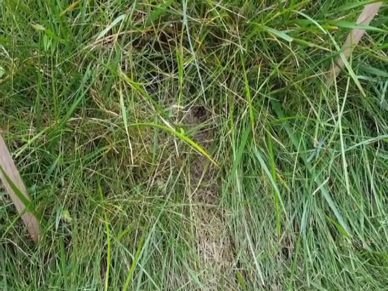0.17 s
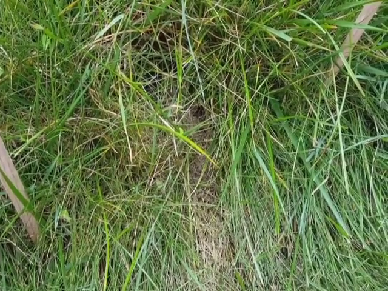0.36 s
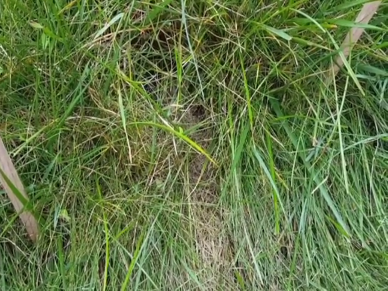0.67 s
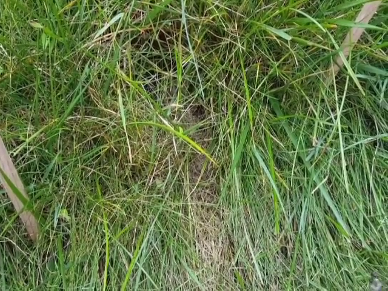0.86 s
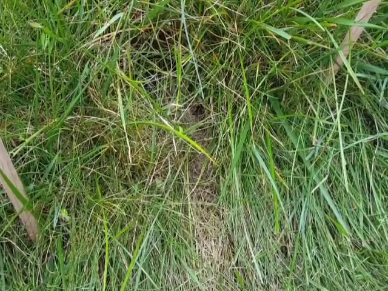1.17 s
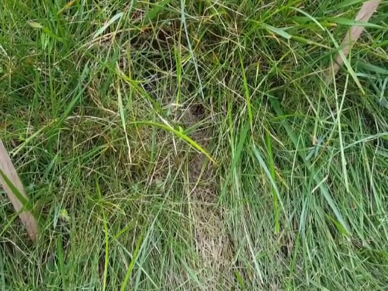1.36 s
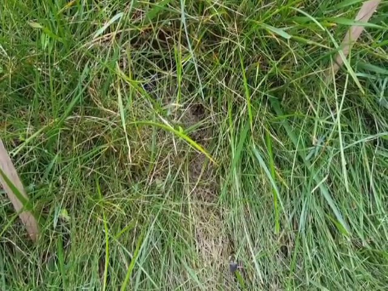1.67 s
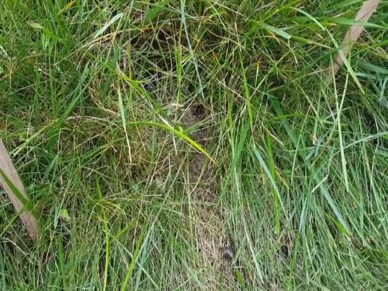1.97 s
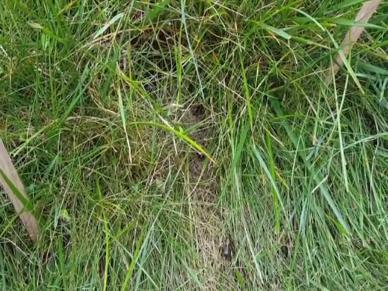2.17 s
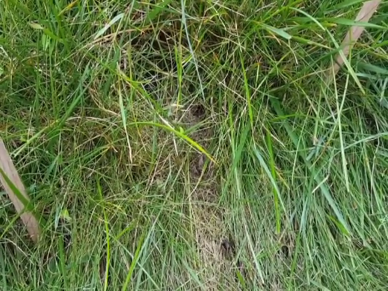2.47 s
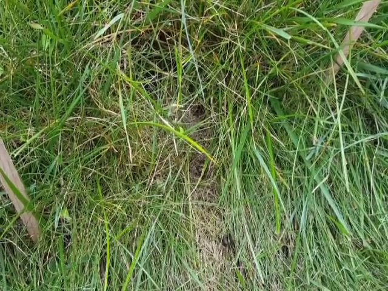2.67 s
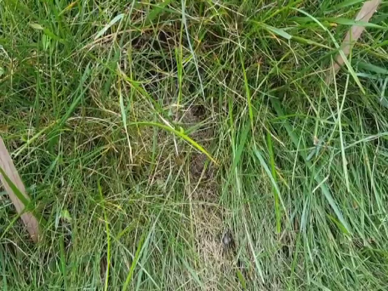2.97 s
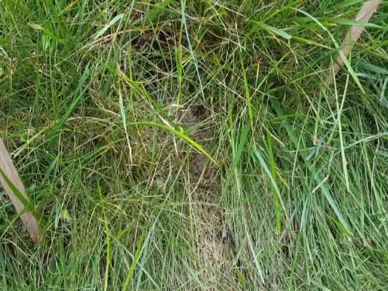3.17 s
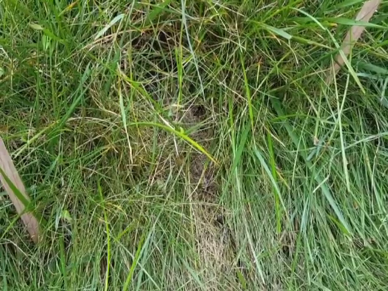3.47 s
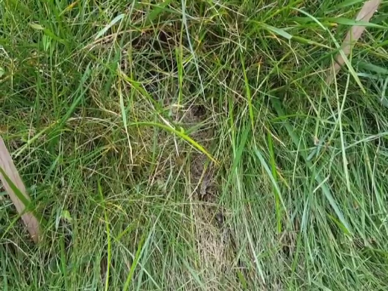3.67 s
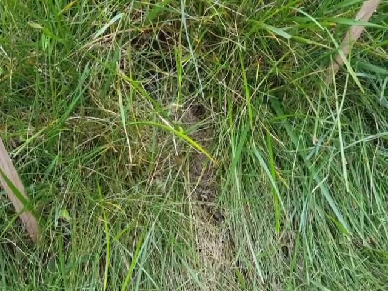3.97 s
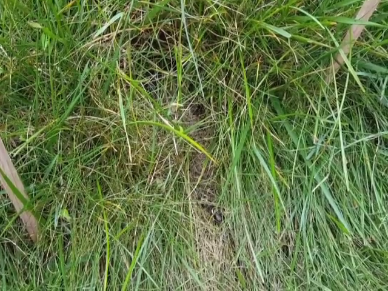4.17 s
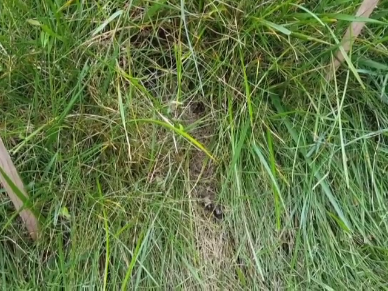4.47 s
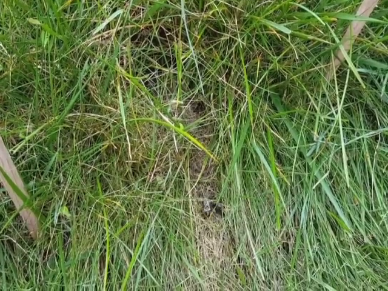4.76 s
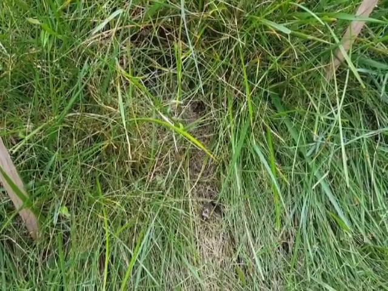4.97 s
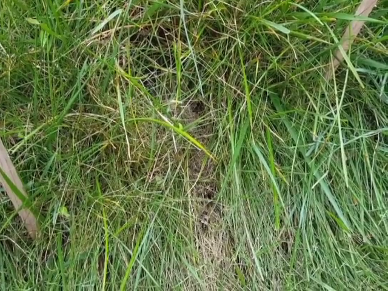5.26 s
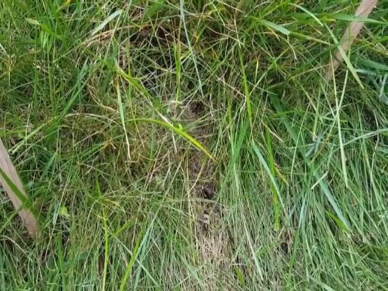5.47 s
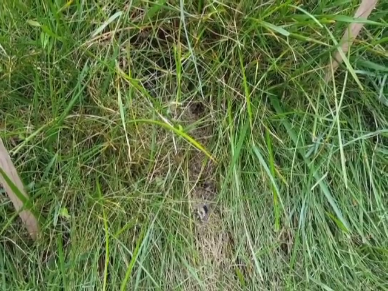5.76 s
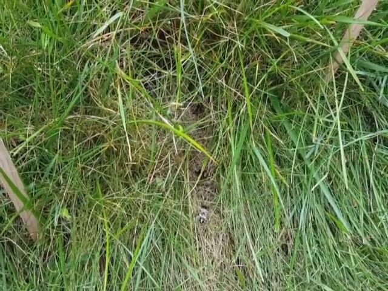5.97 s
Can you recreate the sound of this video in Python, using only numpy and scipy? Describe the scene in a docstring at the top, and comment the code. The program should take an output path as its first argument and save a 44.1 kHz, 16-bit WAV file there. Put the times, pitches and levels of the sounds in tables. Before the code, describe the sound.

Outdoors on a quiet lawn, a bumblebee's low wavering buzz circles for about two seconds, then drops to almost nothing as it lands. Fingers bump, rub and creak against the microphone case in clusters, the loudest a heavy tumble of hollow thuds around four seconds. A faint steady hum comes from the nest hole. The buzz returns abruptly near the end.

```python
"""A bumblebee circles with a wavering buzz over a lawn, lands and takes off again, while fingers bump
and rub a hand-held camera case and a deep steady hum comes from the nest hole in the ground.
The bees are harmonic sums locked to the wingbeat; bumps, creaks and crunches are forces on resonant modes.
Swishes and the soft outdoor hush are coloured noise, whines and a faint drone are wavering tones,
and faint far-off chirps are bursts of noise in narrow bands."""
import sys
import numpy as np
from scipy import signal
from scipy.fft import rfft, irfft, next_fast_len
from scipy.io import wavfile

SR = 44100
rng = np.random.default_rng(int(sys.argv[2]) if len(sys.argv) > 2 else 0)


def to_wav(sig):
    """Store sig (one row per channel, or 1-D mono) as 16-bit WAV at the path in sys.argv[1].

    Samples outside -1..1 are clipped; the rate is SR.
    """
    pcm = np.clip(np.atleast_2d(sig), -1, 1) * 32767
    pcm = np.round(pcm).astype(np.int16)
    wavfile.write(sys.argv[1], SR, pcm.T)  # frames by channels


N = 269715
TIME = np.arange(N) / SR
PORT_LAG_S = 0.0004  # case sounds reach the right port this much later


def from_db(db):
    """Logarithmic level: decibels to amplitude gain."""
    return 10 ** (np.asarray(db) / 20)


def rms_one(x):
    """Normalisation: scale to an effective value of 1."""
    return x / np.sqrt(np.mean(x ** 2) + 1e-20)


def in_time(rows):
    """Linear interpolation: each column of a timed table becomes a curve with one value a sample."""
    s, *columns = np.transpose(rows)
    return [np.interp(TIME, s, column) for column in columns]


def at_hz(points, hz):
    """Logarithmic frequency scale: read a spectrum between its points."""
    point_hz, values = np.array(points).T
    return np.interp(np.log(hz), np.log(point_hz), values)


def drift(rate_hz):
    """Low-passed random process: a slow wander of spread 1."""
    step = 40  # samples between the values of the slow process
    pole = np.exp(-2 * np.pi * rate_hz * step / SR)
    noise = rng.standard_normal(N // step + 2002)
    slow = signal.lfilter([1], [1, -2 * pole, pole * pole], noise)[2000:]  # drop the start-up
    return np.interp(np.arange(N) / step, np.arange(len(slow)), rms_one(slow))


def coloured(spectrum):
    """Spectral shaping: white noise weighted by frequency, with rms 1."""
    size = next_fast_len(N, True)
    hz = np.maximum(np.fft.rfftfreq(size, 1 / SR), 1)
    shaped = rfft(rng.standard_normal(N), size) * from_db(at_hz(spectrum, hz))
    return rms_one(irfft(shaped, size)[:N])


def ringing(modes):
    """Modal superposition: the impulse response of parallel damped resonances, with energy 1."""
    t = TIME[:SR // 4]
    out = sum(from_db(db) * width * np.exp(-np.pi * width * t) * np.cos(2 * np.pi * hz * t)
              for hz, width, db in modes)
    # the response falls steeply outside the range of the modes
    low_hz, high_hz = 0.55 * modes[0][0], min(0.87 * modes[-1][0], SR / 2 - 1000)
    out = signal.sosfilt(signal.butter(3, low_hz, "high", fs=SR, output="sos"), out)
    out = signal.sosfilt(signal.butter(4, high_hz, fs=SR, output="sos"), out)
    return out / np.sqrt(np.sum(out ** 2))


def through(force, modes):
    """Linear convolution: a force sets the modes ringing."""
    return signal.fftconvolve(force, ringing(modes))[:N]


def at_ports(x, lag_s, pan_db):
    """Time and level differences: the right port gets the sound after a lag and at another level."""
    later = np.interp(TIME - lag_s, TIME, x)
    return np.array([x * from_db(pan_db / 2), later * from_db(-pan_db / 2)])


def swell(s, length_s, attack_s, fade_db_per_s):
    """Envelope: linear attack from time s, a hold to the end of the length, then exponential decay."""
    attack = np.clip((TIME - s) / attack_s, 0, 1)
    return attack * from_db(-fade_db_per_s * np.maximum(TIME - s - length_s, 0))


def add(out, s, x):
    """Superposition: mix x into out from time s."""
    at = round(s * SR)
    out[at:at + len(x)] += x[:N - at]


def overtone_numbers(count):
    """Harmonic series: 1, 2, .. count."""
    return np.arange(1, count + 1)


def wingbeat(pitch_hz, jitter):
    """Frequency modulation: the phase of wings whose rate wavers by the fraction jitter."""
    return 2 * np.pi * np.cumsum(pitch_hz * (1 + jitter * drift(31.2))) / SR


# spectrum of the outdoor hush, relative: hz [Hz], density_db [dB per Hz]
HUSH = [(25, -33), (45, 4.5), (65, -0.5), (110, 5.5), (190, -9), (300, -10.5), (480, -16.5), (900, -14.5),
        (1500, -20.5), (2700, -19), (4000, -27.5), (6700, -30.5), (10000, -41), (13500, -34.5)]
# left-right correlation of the hush: hz [Hz], likeness [-1 to 1]
LIKENESS = [(60, 1), (250, 0.93), (500, 0.82), (1000, 0), (2000, 0), (14000, 0.049)]
# faint steady drone: hz [Hz], level_db [dB, before its drift]
DRONE = [(161, -65), (398, -74.5)]
HUSH_DB = -52


def outdoors():
    """Partial coherence: a hush alike at both ports in the bass, with a faint drone of wavering tones."""
    size = next_fast_len(N, True)
    hz = np.maximum(np.fft.rfftfreq(size, 1 / SR), 1)
    alike = np.clip(at_hz(LIKENESS, hz), -1, 1)
    mid, side = rfft(rng.standard_normal((2, size)))
    pan_db = at_hz([(100, -2.0), (1000, -1.0), (4000, -2.5), (8000, -3.0), (13000, 0.0)], hz)
    signs = np.array([[1], [-1]])  # left, right
    colour = from_db(at_hz(HUSH, hz) + signs * pan_db / 2) * np.minimum(hz / 20, 1)
    mixed = np.sqrt(1 + alike) * mid + np.sqrt(1 - alike) * side * signs
    hush = rms_one(irfft(colour * mixed, size)[:, :N])
    drone = np.zeros(N)
    for tone_hz, level_db in DRONE:
        phase = 2 * np.pi * np.cumsum(tone_hz * (1 + 0.0032 * drift(6.6))) / SR
        drone += from_db(level_db + 3.5 * drift(3)) * np.sqrt(2) * np.sin(phase)
    return from_db(HUSH_DB + 1.04 * drift(27)) * hush + drone


# faint chirps far off: start_s [s], length_s [s], level_db [dB, relative]
CHIRPS = [(.76, .06, -71), (.95, .05, -69), (1.07, 0.056, -71), (1.249, 0.033, -74), (2.004, .06, -67),
          (3.129, 0.069, -63), (3.34, 0.066, -69.5), (3.56, .05, -77), (3.771, 0.061, -70),
          (4.705, 0.083, -79), (5.085, 0.073, -71), (5.272, .05, -79), (5.827, 0.058, -74),
          (6.006, .05, -73)]
# bands of the chirps: hz [Hz], width_hz [Hz], level_db [dB, relative]
CHIRP_MODES = [(2400, 300, -17), (2740, 140, 4), (3420, 300, -17.5)]
CHIRP_ATTACK_S, CHIRP_FADE_DB_PER_S = 0.019, 223


def chirps():
    """Band-limited noise: distance blurs each chirp into a narrow band of hiss."""
    gain = sum(from_db(db) * swell(s, length, CHIRP_ATTACK_S, CHIRP_FADE_DB_PER_S)
               for s, length, db in CHIRPS)
    hiss = np.array([through(rng.standard_normal(N), CHIRP_MODES) for _ in "LR"])
    return gain * from_db(2.0 * drift(60)) * hiss


# the grip slides on the case: start_s [s], length_s [s], rumble_db [dB, relative],
# hiss_db [dB, relative]
SLIDES = [(0, 0.033, -32, -65), (0.25, 0.11, -40, -64), (0.374, 0.081, -38.5, -73),
          (1.24, 0.036, -73, -63.5), (1.423, 0.05, -48, -62), (1.513, 0.04, -48, -57.5),
          (1.594, 0.036, -35.5, -70), (1.907, 0.021, -73, -60), (2.05, 0.047, -47.5, -72),
          (2.299, 0.095, -37, -62), (2.427, 0.089, -43, -67), (2.629, 0.04, -37, -87),
          (2.945, 0.084, -39, -82), (3.931, 0.045, -20.5, -96), (4.288, 0.15, -36, -98.5),
          (5.685, 0.089, -45.5, -64.5), (5.896, 0.27, -58.5, -66)]
SLIDE_ATTACK_S, RUMBLE_FADE_DB_PER_S, HISS_FADE_DB_PER_S = 0.015, 95.5, 239


def swish():
    """Friction noise: skin brushing the case hisses in uneven grains."""
    sliding = sum(from_db(hiss_db) * swell(s, length, SLIDE_ATTACK_S, HISS_FADE_DB_PER_S)
                  for s, length, _, hiss_db in SLIDES)
    colour = [(800, -33.5), (2500, -0.5), (5000, -8.5), (8000, -9.5), (10000, -19.0), (13500, -10.5)]
    return sliding * from_db(2.1 * drift(80)) * np.array([coloured(colour), coloured(colour)])


# thin falling whines: start_s [s], length_s [s], start_hz [Hz], level_db [dB, before flutter]
WHINES = [(0.241, 0.22, 3610, -63), (2.354, 0.012, 3690, -55.5), (4.022, 0.11, 3520, -66.5)]
WHINE_ATTACK_S, WHINE_SAG_HZ_PER_S = 0.01, 1050
WHINE_FADE_DB = 7  # lost over each further stretch of its own length


def whine(s, length_s, start_hz, level_db):
    """Frequency and amplitude modulation: a thin grainy tone of rubbing sinks, with a faint octave."""
    hz = start_hz - WHINE_SAG_HZ_PER_S * np.clip(TIME - s, 0, 1)
    waver = 0.026 * drift(350)
    phase = 2 * np.pi * np.cumsum(hz * (1 + waver)) / SR
    flutter = 0.8 + 0.55 * drift(150)
    gain = swell(s, length_s, WHINE_ATTACK_S, WHINE_FADE_DB / length_s) * from_db(level_db) * flutter
    tone = np.sin(phase) + from_db(-10.0) * np.sin(2 * phase)
    return at_ports(gain * tone, lag_s=0.00003, pan_db=-5.5)


# quick runs of stick and slip: start_s [s], length_s [s], level_db [dB, relative]
CRUNCHES = [(1.531, 0.015, -47.5), (1.684, 0.0046, -46), (2.344, 0.0078, -68), (2.651, 0.0069, -53)]
# high modes of the case: hz [Hz], width_hz [Hz], level_db [dB, relative]
CRUNCH_MODES = [(2250, 240, 1), (2490, 110, 10), (3000, 120, 4), (3980, 130, -7), (5100, 270, -40),
                (6150, 370, -26), (8450, 1600, -36)]
CRUNCH_SLIPS_PER_S, CRUNCH_ATTACK_S, CRUNCH_FADE_DB_PER_S = 1300, 0.0011, 900


def crunches():
    """Stick-slip friction: dense slips of uneven size ring high modes, partly differently at each port."""
    gain = sum(from_db(db) * swell(s, length, CRUNCH_ATTACK_S, CRUNCH_FADE_DB_PER_S)
               for s, length, db in CRUNCHES)
    slips = (rng.random((3, N)) < CRUNCH_SLIPS_PER_S / SR) * rng.standard_normal((3, N))
    shared, left, right = (through(gain * rms_one(row), CRUNCH_MODES) for row in slips)
    return at_ports(shared, PORT_LAG_S, pan_db=-7.5) + from_db(-13.0) * np.array([left, right])


BUMP_S = 0.015  # a bump's force has the energy of a unit-rms force this long
ONSET_S = 0.000082  # time constant of the rattle's near-instant onset
RATTLE_GRAIN_DB, RATTLE_GRAINS_PER_S = 4.5, 232  # the rattle comes in uneven little knocks


def push(rattle, t60):
    """Impulsive excitation: one push, and a grainy rattle of the grip that starts at once and dies."""
    t = TIME[:SR // 2]
    lumps = np.interp(t, np.arange(128) / RATTLE_GRAINS_PER_S, rng.standard_normal(128))
    grain = from_db(RATTLE_GRAIN_DB * lumps) * rng.standard_normal(len(t))
    shape = (1 - np.exp(-t / ONSET_S)) * from_db(-60 * t / max(t60, 0.01))
    force = rattle * rms_one(grain * shape) / np.sqrt(len(t))
    force[0] += 1
    return np.sqrt(BUMP_S * SR / (1 + rattle ** 2)) * force


# finger bumps on the case: start_s [s], level_db [dB, relative], heft_db [dB of added boom],
# hardness_db [dB, scaled by each growth factor for knock and clack], snap_db [dB of added dry crack],
# pitch_hz [Hz, thud tuning], rattle_t60_s [s, scaled by each linger factor]
BUMPS = [(0.05, -37, 6, 3.5, 13, 203, 0.5), (.105, -44, -12, 7, 19, 200, 0.043),
         (.248, -38, -1, 9, 13, 156, 0.27), (.32, -33, -11, -4, 9, 203, 0.088),
         (0.407, -57, -9, 2, -10, 215, 0.14), (0.647, -35, -13, -24, 4, 197, 0.41),
         (1.439, -33, -9, -11, -3, 156, 0.064), (1.472, -27, -9, -19, -20, 174.5, 0.33),
         (1.518, -22.5, -13, -14, -6, 271.6, 0.11), (1.533, -28.5, 8.5, 8, 13.5, 197, 0.092),
         (1.548, -26.5, -1, -4, -2, 242, 0.11), (1.573, -25.5, -3, -15, -14, 171, 0.2),
         (1.608, -35, 0, 3, -8, 138, 0.092), (1.687, -25, -19, -4.5, 9, 155, 0.073),
         (2.343, -32, -24, 10, 9.5, 210, 0.18), (2.364, -26.5, -11, -14, -6, 219.3, 0.1),
         (2.444, -35, -2, 11.5, 12, 227, 0.1), (2.617, -26.5, -12, 1.5, 2, 232, 0.17),
         (2.65, -32, -2, -7, 10, 204.5, 0.17), (2.677, -35, -3, 14.5, 8, 214, 0.09),
         (2.682, -22.5, -2, -9, 2, 176, 0.28), (2.732, -34.5, 4.5, -14, -12, 197, 0.15),
         (2.939, -38, 6, 15.5, 20, 192.6, 0.19), (2.954, -29.5, 6, -2, 1, 190, 0.43),
         (3.016, -42.5, 10, -12, -3, 199, .2), (3.942, -7, -2.5, 3, -2.5, 194, 0.23),
         (3.955, -3.5, -20, -10, -25.5, 211, 0.023), (3.974, -12, -19, -15.5, -20, 210.7, 0.36),
         (3.989, -11.5, -2, -3.5, -8, 211.5, 0.18), (4.03, -20.5, -7, -6, -8.5, 188, 0.24),
         (4.069, -27.5, 9, -21.5, -8, 192, 0.13), (4.137, -23, -1, -23.5, -9, 200, 0.18),
         (4.158, -25.5, -10.5, -27.5, -17, 189, 0.29), (4.209, -22, -29, -4, -8, 188.5, 0.27),
         (4.241, -27, -8, -21, -12, 186.5, 0.096), (4.271, -9.5, -10, -21.5, -18, 188.3, 0.15),
         (4.32, -27, -12, 2, -2, 224, 0.29), (4.379, -26, -4, -20, -8, 173, 0.19),
         (4.417, -14.5, -10.5, -23, -17, 167, 0.078), (4.458, -24.5, -1, -28, -9, 189.6, 0.096),
         (4.501, -33, 1, -14, -24, 174.6, 0.28), (4.574, -42, 8.5, -7, -18, 154, 0.07),
         (5.652, -38.5, -20, -13, 10, 267.2, .18), (5.736, -37.5, -5, -16, -9, 168, 0.15)]
USUAL_BUMP_DB = -32


def blows(rattle, linger, heavy=False, growth=0, snappy=False, damping=0):
    """Excitation of a mode group: the force of all bumps, where damping takes dB per dB above usual."""
    force = np.zeros(N)
    for s, level_db, heft_db, hardness_db, snap_db, _, t60 in BUMPS:
        damped_db = damping * max(level_db - USUAL_BUMP_DB, 0)
        blow_db = level_db + heavy * heft_db + growth * hardness_db + snappy * snap_db - damped_db
        add(force, s, from_db(blow_db) * push(rattle, t60 * linger))
    return force


# thud modes at the reference tuning: hz [Hz], width_hz [Hz], level_db [dB, relative]
THUD_MODES = [(162, 30, -8), (204, 21, 0), (250, 40, -18)]
THUD_HZ = 200  # reference tuning


def thuds(rattle, linger):
    """Mass and stiffness loading: the grip differs at each bump, so each thud has its own pitch."""
    out = np.zeros(N)
    for s, level_db, _, _, _, pitch_hz, t60 in BUMPS:
        modes = [(hz * pitch_hz / THUD_HZ, width, db) for hz, width, db in THUD_MODES]
        thud = signal.fftconvolve(push(rattle, t60 * linger), ringing(modes))
        add(out, s, from_db(level_db) * thud)
    return out


# hollow, hard and dry modes of the case: hz [Hz], width_hz [Hz], level_db [dB, relative]
KNOCK_MODES = [(303, 290, -15.5), (387, 88, 8), (534, 170, -2.5), (596, 240, 17)]
CLACK_MODES = [(721.4, 16, 12.5), (862, 52, 8.5), (990, 350, 7.5), (1117, 72, -2)]
CRACK_MODES = [(1350, 540, 3.5), (1470, 200, 11.5), (1857, 530, 13), (2164, 180, 14.5), (2534, 140, 15),
               (2880, 130, 3.5), (3150, 52, 7.5), (3850, 820, -22.5), (6300, 470, 7.5)]
KNOCK_GROWTH, CLACK_GROWTH = 0.67, 0.8  # dB gained per dB of hardness
KNOCK_DAMPING = 0.3  # stronger bumps knock less in proportion: dB lost per dB above a usual bump


def shell_rattle():
    """Local vibration: after a bump the shell around one port rattles in its own way."""
    hollow_force = blows(rattle=7.4, linger=3.2, growth=KNOCK_GROWTH, damping=KNOCK_DAMPING)
    hollow = from_db(-34.5) * through(hollow_force, KNOCK_MODES)
    hard = from_db(-26.0) * through(blows(rattle=9.1, linger=1.1, growth=CLACK_GROWTH), CLACK_MODES)
    dry = from_db(-33) * through(blows(rattle=14.0, linger=2.7, snappy=True), CRACK_MODES)
    return hollow + hard + dry


# creaks of the plastic: start_s [s], level_db [dB, of the click before the creak gain]
CREAKS = [(.0638, -51), (.196, -55), (0.2702, -48.5), (0.3526, -46), (0.395, -46), (0.436, -53),
          (0.5376, -52), (2.7535, -49), (2.979, -50), (4.703, -58)]
# modes of the creaks: hz [Hz], width_hz [Hz], level_db [dB, relative]
CREAK_MODES = [(2106, 200, 10.5), (2770, 200, 0), (3310, 230, 3)]
TICKS_PER_S, TICK_DB = 6.4, -64  # fainter creaks at random; level before the creak gain


def creaks():
    """Impulse response: single clicks of the plastic ring its modes."""
    clicks = from_db(TICK_DB) * (rng.random(N) < TICKS_PER_S / SR)
    for s, level_db in CREAKS:
        clicks[round(s * SR)] = from_db(level_db)
    return from_db(19.5) * through(clicks, CREAK_MODES)


# deep modes of the case: hz [Hz], width_hz [Hz], level_db [dB, relative]
BOOM_MODES = [(78.5, 10, -15.5), (97.9, 22, 10), (142, 44, 9)]
RESTING_GRIP_DB = -55.5  # rumble force of a hand held still, before its drift


def handling():
    """Structure-borne sound: bumps and a sliding grip shake the case, from deep boom to dry crack."""
    sliding = sum(from_db(rumble_db) * swell(s, length, SLIDE_ATTACK_S, RUMBLE_FADE_DB_PER_S)
                  for s, length, rumble_db, _ in SLIDES)
    grip = np.hypot(sliding, from_db(RESTING_GRIP_DB))
    rub = grip * from_db(2.0 * drift(25)) * rng.standard_normal(N)
    # each group of modes takes its own mix of blows and rubbing
    boom_force = blows(rattle=0.47, linger=0.62, heavy=True) + from_db(-6.0) * rub
    boom = from_db(-5.0) * through(boom_force, BOOM_MODES)
    thud = from_db(-4.0) * (thuds(rattle=0.62, linger=0.93) + through(rub, THUD_MODES))
    knock_blows = blows(rattle=2.4, linger=0.97, growth=KNOCK_GROWTH, damping=KNOCK_DAMPING)
    knock = from_db(-15.5) * through(knock_blows + from_db(-6.0) * rub, KNOCK_MODES)
    clack_force = blows(rattle=3.1, linger=0.63, growth=CLACK_GROWTH) + from_db(-2.0) * rub
    clack = from_db(-23.0) * through(clack_force, CLACK_MODES)
    crack_force = blows(rattle=8.1, linger=0.17, snappy=True) + rub
    crack = from_db(-32.0) * through(crack_force, CRACK_MODES)
    shared = at_ports(boom + thud + knock + clack + crack + creaks(), PORT_LAG_S, pan_db=-1.25)
    return shared + np.array([shell_rattle(), shell_rattle()]) * from_db([[-1.5], [1.5]])


# overtones of the hum from the ground: hz [Hz], level_db [dB, relative]
HUM_TONE = [(118, 9.5), (236, -32.5), (354, -30.5), (470, -18), (590, -19.5), (900, -43)]
# spells of wing fanning in the nest: start_s [s], length_s [s], pitch_hz [Hz, wingbeat],
# level_db [dB, relative]
FANNING = [(0.546, 2.1, 134.2, -56.5), (2.945, 1.6, 118.3, -58.5), (4.977, 1.2, 117, -57)]
FAN_ATTACK_S, FAN_FADE_DB_PER_S = 0.49, 67


def ground_hum(s, length_s, pitch_hz, level_db):
    """Harmonic synthesis: wings fanning in one place give a smooth deep tone with faint overtones."""
    phase = wingbeat(pitch_hz, jitter=0.0057)
    hum = sum(from_db(at_hz(HUM_TONE, k * pitch_hz)) * np.sin(k * phase)
              for k in overtone_numbers(count=7))
    gain = swell(s, length_s, FAN_ATTACK_S, FAN_FADE_DB_PER_S) * from_db(level_db + 0.24 * drift(23))
    return at_ports(np.sqrt(2) * gain * hum, lag_s=0, pan_db=-2.5)


# overtones of the flying bee: hz [Hz], level_db [dB, relative, before tilt]
FLYER_TONE = [(190, -1.5), (380, 3), (560, -6.5), (740, -7.5), (930, -10.5), (1120, -13), (1450, -20.5),
              (1750, -23), (2100, -35.5), (2800, -42), (5000, -58.5), (9000, -62.5)]
# air stirred by the wings, relative: hz [Hz], density_db [dB per Hz]
WING_AIR = [(250, -27), (550, -6), (1200, 0), (1900, -6), (2900, -8.5), (5000, -21.5), (10000, -23.5)]
# the bee comes in, lands and takes off, and its brightness changes along the flight:
# start_s [s], level_db [dB, relative], tilt_db [dB per octave above the second overtone number]
FLIGHT = [(0, -63.5, 3), (.33, -66.5, 2), (.58, -63, 0.5), (.7, -64, .5), (1.25, -62, 2.5),
          (1.38, -64.5, 4.5), (1.46, -62, 2), (1.75, -65, 5.5), (1.9, -63.5, 4), (2.2, -73.5, 3.5),
          (3.1, -69.5, 3.5), (4.0, -73.5, 6), (5.57, -74.5, 5.5), (5.65, -62, 5.5), (5.83, -64.5, 8),
          (5.9, -60.5, 5.5), (6.12, -61, 4)]
# wingbeat dipping and rising with each turn: start_s [s], pitch_hz [Hz, before jitter]
WINGBEAT = [(0, 191.8), (.07, 195.5), (.11, 187), (.22, 195.6), (.33, 203.8), (.45, 188.1), (.49, 195),
            (.59, 177.7), (.65, 195.6), (.77, 185), (.8, 195), (.91, 195), (.99, 181.4), (1.03, 184.4),
            (1.07, 196.5), (1.13, 182.4), (1.22, 200.3), (1.3, 188), (1.34, 198), (1.38, 177.9),
            (1.42, 195.7), (1.48, 184.5), (1.57, 196.6), (1.64, 194), (1.79, 205.7), (1.85, 187.7),
            (1.91, 206.4), (2.05, 194.9), (2.12, 199.3), (4.7, 198.8), (5.58, 176.4), (5.7, 174.3),
            (5.77, 185.7), (5.82, 180.5), (5.855, 186.3), (5.895, 168.2), (5.93, 184.3), (5.96, 183.2),
            (6.0, 187.4), (6.04, 174), (6.08, 180.8), (6.12, 179.5)]


def flying_bee():
    """Periodic pressure pulses: the wingbeat wavers as the bee steers, duller and edgier by turns."""
    level_db, tilt_db = in_time(FLIGHT)
    pitch_hz, = in_time(WINGBEAT)
    phase = wingbeat(pitch_hz, jitter=0.007)
    buzz = np.zeros((2, N))
    for k in overtone_numbers(count=32):
        # the body turns, so every overtone fades in and out by itself
        tone_db = at_hz(FLYER_TONE, k * np.mean(pitch_hz))
        gain = from_db(tone_db + tilt_db * np.log2(k / 2) + 2.1 * drift(24.0))
        # echoes off the ground shift the higher overtones more between the ports
        shift = min(0.2 * k, 1.2) * drift(5.8)
        buzz += gain * np.sin([k * phase + shift, k * phase - shift])
    # each stroke also sheds a puff of turbulent air
    stroke = ((1 + np.cos(phase)) / 2) ** 2
    puffs = stroke * np.array([coloured(WING_AIR), coloured(WING_AIR)])
    air = from_db(-3.5 + 1.3 * tilt_db) * puffs
    return from_db(level_db) * (np.sqrt(2) * buzz + air) * from_db([[-1.0], [1.0]])


def scene():
    """Superposition: lawn, hand and bees together."""
    hand = handling() + crunches() + swish() + sum(whine(*row) for row in WHINES)
    bees = flying_bee() + sum(ground_hum(*spell) for spell in FANNING)
    return outdoors() + chirps() + hand + bees


def record(dry):
    """Low-pass filtering: an elliptic filter cuts the top steeply above 14550 Hz."""
    return signal.sosfilt(signal.ellip(12, 0.2, 80, 14550, fs=SR, output="sos"), dry)


dry = scene()
out = record(dry)
to_wav(out)
```